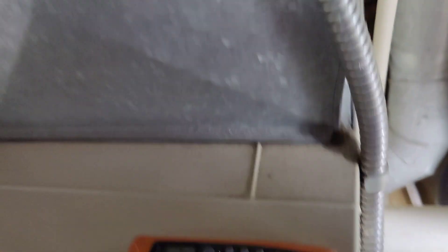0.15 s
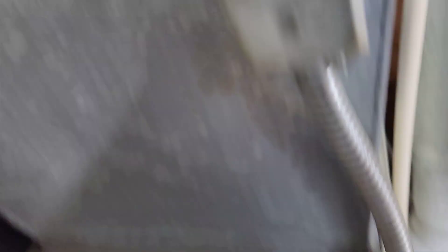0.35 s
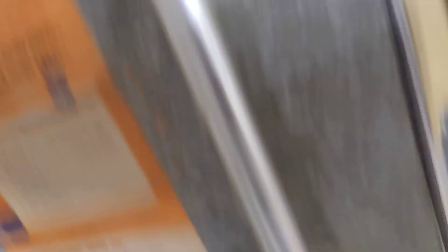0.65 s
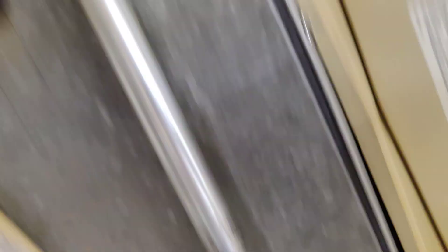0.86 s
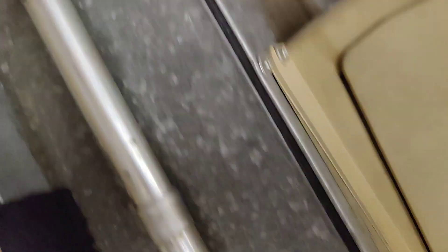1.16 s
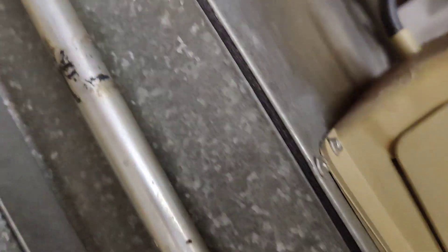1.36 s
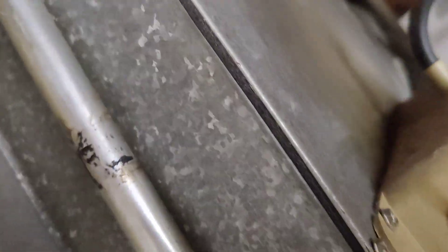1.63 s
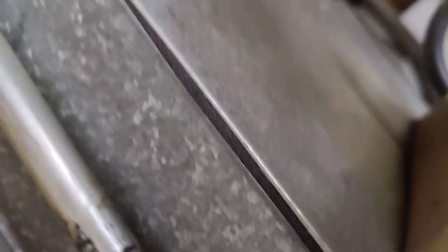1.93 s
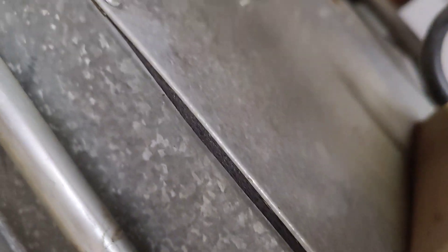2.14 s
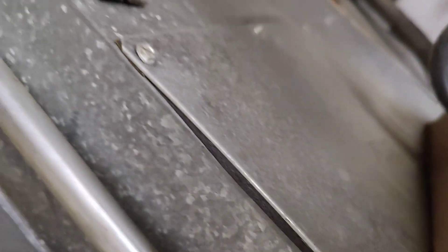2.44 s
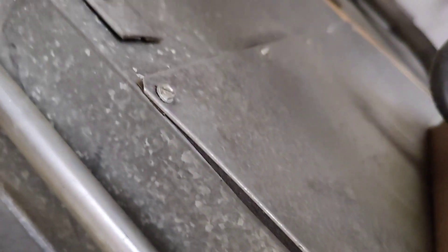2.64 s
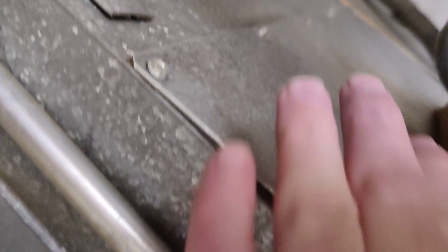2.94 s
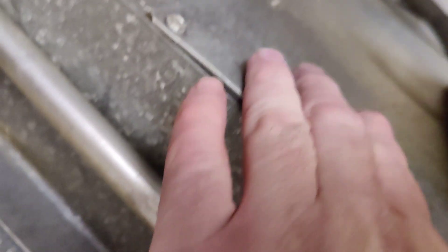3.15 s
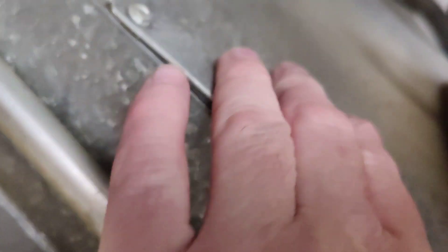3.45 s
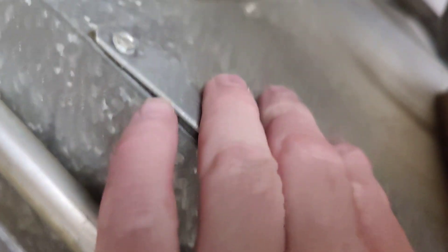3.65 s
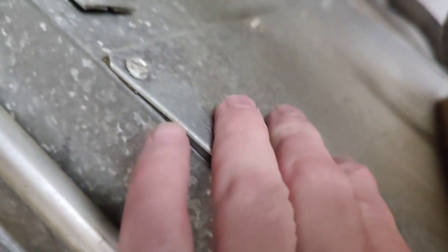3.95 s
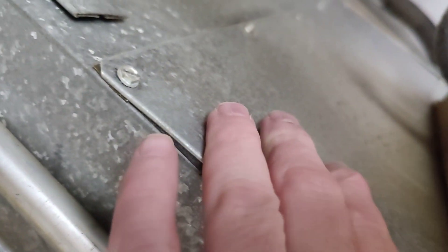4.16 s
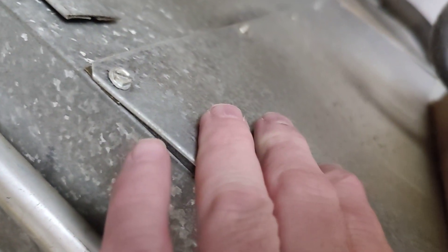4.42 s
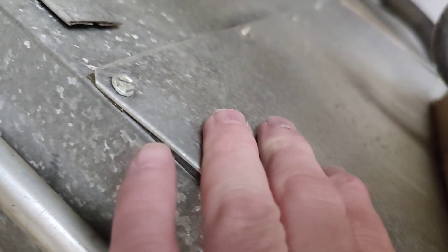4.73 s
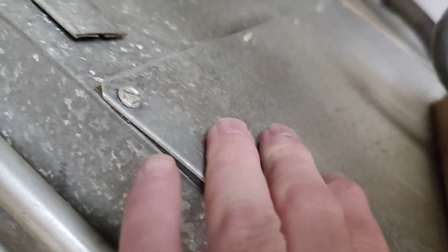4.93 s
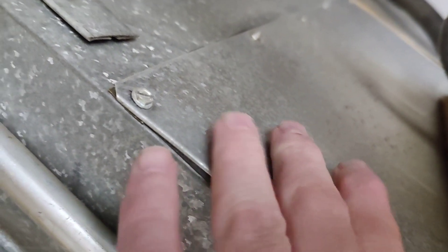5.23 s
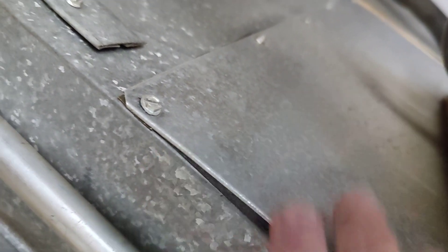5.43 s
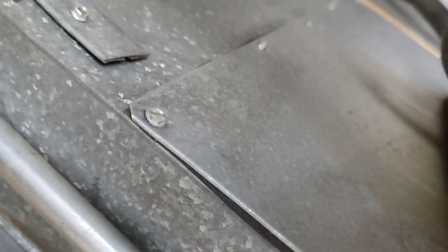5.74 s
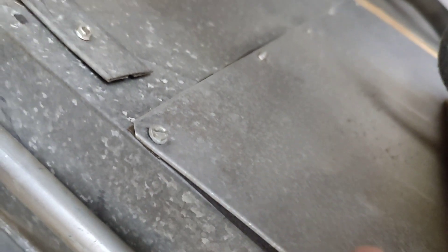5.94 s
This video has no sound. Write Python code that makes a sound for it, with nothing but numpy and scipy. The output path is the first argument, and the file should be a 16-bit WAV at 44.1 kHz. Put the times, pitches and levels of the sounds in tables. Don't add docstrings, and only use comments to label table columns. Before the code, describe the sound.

A furnace blower runs throughout: a constant deep electrical hum, fluctuating low duct rumble, a muffled roar of air and very faint hiss from the seams. A low soft knock on the microphone opens it, with two quick metallic slaps by 0.1 s, a clear tick near 0.3 s and another slap near 0.7 s. Rumble swells as the stereo microphone moves close, and a small tick comes about 1.15 s. From 1.5 to 3.1 s the loose panel slaps its seam in a fast, nearly regular rattle, about eight a second, weakening at the end. Faint skin rubs start around 2.4 s and the hand settles at 3.25 s. The rattle is silenced; only hum, booming air and small ticks near 3.5 and 4.5 s remain. At 5.4 s the hand shifts, a slap and low tick sound at 5.5 s, skin slides off around 5.7 s, and a light slap follows near 6 s.

```python
import sys
import numpy as np
from scipy import signal
from scipy.fft import rfft, irfft
from scipy.io import wavfile
from scipy.ndimage import uniform_filter1d

SR = 44100
rng = np.random.default_rng(int(sys.argv[2]) if len(sys.argv) > 2 else 0)


def digitize_waveform(pressure):
    field = np.atleast_2d(pressure).T
    bounded = np.clip(field, -1, 1)
    quanta = np.round(bounded * 32767).astype(np.int16)
    wavfile.write(sys.argv[1], SR, quanta)


def to_linear_factor(level_db):
    exponent = np.asarray(level_db, float) / 20
    return 10 ** exponent


N = 268348

# (time [s], nearness to the duct [0-1], aim as left minus right [dB])
CAMERA_PATH = [
    (0.0, 0.12, 0),
    (0.4, .2, 1.5),
    (0.9, 0.4, 1),
    (1.4, 0.7, -2),
    (1.9, 0.7, 4),
    (2.4, .95, -0.8),
    (3.0, 1, 1.3),
    (4.3, 1, -5),
    (6.08, 0.92, -5.5),
]
# (time [s], level [dB])
SURGES = [(0.0, -3), (0.39, 3.5), (0.6, -.7), (0.91, -4), (1.41, 2), (1.6, -2.5), (2.03, 4), (2.3, 0),
          (4.2, -1.4), (4.42, -3.5), (4.56, 1), (4.7, -2.2), (4.89, 1.5), (5.05, -3.5), (5.4, -0.8),
          (5.6, -3.5), (5.85, -3.5), (6.05, 2.5)]


def evened(x):
    return x / np.sqrt(np.mean(x ** 2) + 1e-20)


def read(points, hz):
    f, value = np.transpose(points)
    return np.interp(np.log(hz + 1), np.log(f + 1), value)


def closed(points, hz):
    inside = (hz >= points[0][0]) * (hz <= points[-1][0] + 300)
    return to_linear_factor(read(points, hz)) * inside


def curve(rows, column):
    rows = np.array(rows)
    return np.interp(np.arange(N) / SR, rows[:, 0], rows[:, column])


def coloured(x, gain):
    n = x.shape[-1]
    return irfft(rfft(x) * gain(np.fft.rfftfreq(n, 1 / SR)), n)


def add(mix, start_s, sound, pan_db):
    part = mix[:, round(start_s * SR):][:, :sound.shape[1]]
    sides = to_linear_factor(np.array([[pan_db], [-pan_db]]) / 2)
    part += (sound * sides)[:, :part.shape[1]]


def air(gain, patchy_db, flicker_db, size):
    # (frequency [Hz], left-right likeness [-1 to 1])
    likeness = [(60, 0.99), (150, 0.95), (250, 0.78), (400, 0.82), (630, 0.096), (1000, 0.011),
                (1600, 0.47), (2600, .01), (5500, 0.19), (8100, 0.33), (8400, .94), (12500, .93),
                (12900, .4)]
    # (frequency [Hz], left minus right [dB])
    side_lean = [(60, -0.6), (150, 0.9), (630, -0.2), (1600, 0.8), (4000, 0), (8200, -1), (15000, 2.5)]
    frames, hz = N * 4 // size + 5, np.fft.rfftfreq(size, 1 / SR)
    a, b, c, d, patches = rng.standard_normal((frames, len(hz), 5)).T
    patches = uniform_filter1d(patches, size=6, axis=0)
    patches = evened(uniform_filter1d(patches, size=10, axis=1))
    flicker = evened(uniform_filter1d(rng.standard_normal(frames), size=4))
    same = np.clip(read(likeness, hz), -1, 1)[:, None]
    left, other = a + 1j * b, c + 1j * d
    z = np.array([left, same * left + np.sqrt(1 - same ** 2) * other])
    z *= gain(hz)[:, None] * to_linear_factor(patchy_db * patches + flicker_db * flicker)
    z *= to_linear_factor(np.outer([.5, -.5], read(side_lean, hz)))[:, :, None]
    noise = signal.istft(z, nperseg=size, noverlap=size * 3 // 4)[1]
    return evened(noise[:, :N])


def thump():
    hz, t60_s = 70, .08
    t = np.arange(N) / SR
    return to_linear_factor(-19.5 - 60 * t / t60_s) * np.cos(2 * np.pi * hz * t)


def motor():
    hum_hz, drift_rad = 119.97, 0.27
    drift = uniform_filter1d(rng.standard_normal(N), size=9000)
    drift = evened(uniform_filter1d(drift, size=9000))
    phase = 2 * np.pi * hum_hz * np.arange(N) / SR + drift_rad * drift
    level_db = -28 + 1.05 * curve(CAMERA_PATH, column=1) + 0.057 * curve(SURGES, column=1)
    return to_linear_factor(level_db) * np.sqrt(2) * np.cos(phase)


def duct_rumble():
    # (frequency [Hz], density [dB per Hz])
    spectrum = [(20, -22.5), (32, -17), (52, -5.5), (68, 0.5), (78, -3.5), (97, -2), (105, -2.5),
                (111, -10.5), (130, -5), (155, -10), (172, -16.5), (200, -34)]
    rumble = air(lambda hz: closed(spectrum, hz), patchy_db=2.0, flicker_db=0.6, size=8192)
    level_db = -29.85 + 6 * curve(CAMERA_PATH, column=1) + curve(SURGES, column=1)
    return to_linear_factor(level_db) * rumble


def air_roar():
    # (frequency [Hz], density [dB per Hz])
    spectrum = [(150, -25), (185, 0), (225, -3.5), (250, -7), (310, -15), (420, -11.5), (540, -12.5),
                (660, -20.5), (830, -16), (1100, -24), (1800, -23.5), (2200, -26), (2800, -36.5),
                (3400, -53.5)]
    # (frequency [Hz], width [Hz], lift [dB])
    panels = [(214.5, 4.7, 5), (278, 31, 6.5), (365, 15, 4.5), (389.2, 25, 7), (464, 5, -1.5),
              (516, 6.7, -0.5), (540, 14, 2), (595.2, 18, 10), (677, 36, 2), (840, 36, 2), (970, 45, 1.5),
              (1127, 65, 5.5), (1385, 20, 2.5), (1850, 84, 1.5)]

    def gain(hz):
        lift_db = sum(db / (1 + (2 * (hz - f) / width) ** 2) for f, width, db in panels)
        return closed(spectrum, hz) * to_linear_factor(lift_db)

    near = curve(CAMERA_PATH, column=1)
    roar = air(gain, patchy_db=2.0, flicker_db=0.46, size=4096)
    boom = coloured(roar, lambda hz: 1 / (1 + (hz / 550) ** 4))
    roar = roar + (to_linear_factor(1.5 - 1.5 * near) - 1) * boom
    level_db = -37 - 2.5 * near + 0.1 * curve(SURGES, column=1)
    return to_linear_factor(level_db) * roar


def seam_leak():
    # (frequency [Hz], density [dB per Hz])
    hiss_spectrum = [(2300, -19), (3000, 0.5), (3800, -2.5), (4650, -2.5), (5050, -8.5), (6000, -10),
                     (6900, -10), (7500, -13.5), (8600, -23), (9800, -19), (11200, -22.5), (12400, -21),
                     (13900, -15.5), (15900, -18.5)]
    # (frequency [Hz], density [dB per Hz])
    sizzle_spectrum = [(5000, -28), (5700, -11), (6400, 2), (6900, 2.5), (7300, -10), (7800, -11),
                       (8400, -21.5)]
    # (time [s], level [dB])
    looseness = [(0.2, -72), (0.35, -63), (1.03, -69), (1.5, -71), (1.8, -67), (2.1, -63), (2.45, -76),
                 (3.23, -69), (3.74, -75.5), (5.27, -73.5), (5.62, -65.5), (6.08, -72)]
    hiss = air(lambda hz: closed(hiss_spectrum, hz), patchy_db=0.8, flicker_db=0.15, size=512)
    sizzle = air(lambda hz: closed(sizzle_spectrum, hz), patchy_db=0.0, flicker_db=1.9, size=256)
    hiss_db = -60.5 - 3 * curve(CAMERA_PATH, column=1)
    return to_linear_factor(hiss_db) * hiss + to_linear_factor(curve(looseness, column=1) - 4.5) * sizzle


def slap(db, bright_db, body_db, length_s):
    # (frequency [Hz], density [dB per Hz])
    crack_spectrum = [(800, -4.5), (1300, 2.5), (1900, -2.5), (2600, -12.5), (3600, -26), (4600, -18.5),
                      (5300, -17), (6800, -6.5), (7600, -14), (8700, -24), (10000, -18), (11700, -26),
                      (14000, -20), (15600, -28.5)]
    # (frequency [Hz], density [dB per Hz])
    ring_spectrum = [(800, -10.5), (2500, -15.5), (4600, -8.5), (5500, -9), (6400, -4.5), (6900, -6),
                     (7400, -8.5), (8700, -18), (11500, -21), (14000, -17), (15900, -21)]
    t = np.arange(round(.3 * SR)) / SR
    contacts = np.zeros(len(t))
    at, weakness = rng.random((2, 7))
    contacts[((.15 + at) * length_s * SR).astype(int)] = to_linear_factor(-8 - 5 * weakness - 8 * at)
    contacts[0] = 1
    chatter = np.convolve(contacts, to_linear_factor(-60 * t[:600] / .028))[:len(t)]
    tail = to_linear_factor(-12.5 - 60 * t / (11 * length_s)) + to_linear_factor(-25.0 - 60 * t / 0.92)
    shared, left, right = rng.standard_normal((3, len(t)))
    noise = np.array([left, right]) + 0.59 * shared

    def tilt(hz):
        return to_linear_factor(np.interp(hz, [2400, 3400, 8100, 8900], [body_db, 0, 0, bright_db]))

    crack = evened(coloured(noise, lambda hz: closed(crack_spectrum, hz) * tilt(hz)))
    ring = evened(coloured(noise[:, ::-1], lambda hz: closed(ring_spectrum, hz) * tilt(hz)))
    body = coloured(crack, lambda hz: hz < 2800)
    swell = 0.88 * (1 - np.exp(-t / 0.003)) * to_linear_factor(-60 * t / 0.15)
    blow = (crack - body) * chatter + body * swell + ring * tail
    return to_linear_factor(db + 4.5) * blow * np.minimum(t * 1800, 1)


def tick(db, pitch_hz, over_db):
    # (multiple of the pitch [ratio], level [dB])
    overtones = [(.5, 6.5), (1.499, 0.5), (2.1, -14.5)]
    t60_s = 66 / pitch_hz
    t = np.arange(round(.04 * SR)) / SR
    modes = np.sin(2 * np.pi * pitch_hz * t)
    for multiple, mode_db in overtones:
        modes = modes + to_linear_factor(over_db + mode_db) * np.sin(2 * np.pi * pitch_hz * multiple * t)

    def near_pitch(hz):
        return np.exp(-(np.log((hz + 1) / (1.08 * pitch_hz)) / .16) ** 2)

    snap = evened(coloured(rng.standard_normal(len(t)), near_pitch))
    ring = modes * to_linear_factor(-60 * t / t60_s) * (1 - np.exp(-t / 0.0003))
    ring = ring + to_linear_factor(-2.0 - 60 * t / 0.006) * snap
    lags = (rng.uniform(0.0067, .0085, (2, 2)) * SR).astype(int)
    heard = [ring + sum(.22 * np.roll(ring, lag) for lag in pair) for pair in lags]
    return to_linear_factor(db + 4) * np.array(heard)


def rub(length_s, db, fade_db):
    # (frequency [Hz], density [dB per Hz])
    spectrum = [(2600, -26), (3600, -6.5), (4600, -4.5), (5300, -8), (6900, -2), (8600, -14.5),
                (10000, -9.5), (11500, -13.5), (13800, -6), (15700, -6.5)]
    rise, release = .12, 0.32
    u = np.arange(0, length_s, 1 / SR) / length_s
    grit = rng.standard_normal((3, len(u))) * to_linear_factor(1.7 * rng.exponential(1, len(u)))
    hiss = evened(coloured(grit[:2] + 0.57 * grit[2], lambda hz: closed(spectrum, hz)))
    dull = coloured(hiss, lambda hz: hz < 8300)
    hiss = hiss + (to_linear_factor(2.5 * u) - 1) * dull
    stroke = np.minimum(np.minimum(u / rise, (1 - u) / release), 1)
    return stroke * to_linear_factor(db + fade_db * u + 6.5) * hiss


def scene():
    # (time [s], level [dB], brightness [dB], chatter length [s])
    slaps = [(0.017, -57.5, 0.5, 0.0045), (0.073, -48.5, 1, 0.02), (0.674, -48.5, 0, 0.015),
             (1.5174, -51.5, -2.5, 0.014), (1.6344, -44.5, -4.5, 0.013), (1.756, -45, -4, 0.012),
             (1.8764, -42, -1.5, 0.012), (1.996, -46, -8, .01), (2.118, -48.5, -6, 0.0091),
             (2.2363, -43, -2.5, 0.01), (2.356, -43.5, 4, .012), (2.478, -45.5, 2, 0.013),
             (2.721, -44.5, 2, 0.011), (2.84, -47, 2.5, 0.013), (2.968, -57, -1.5, .008),
             (3.087, -60.5, -2.5, 0.0076), (5.498, -48, 4, 0.004), (5.98, -51.5, -2.5, 0.006)]
    # (time [s], level [dB], pitch [Hz], overtones [dB])
    ticks = [
        (.1125, -58, 4300, -14),
        (0.2865, -44.5, 4160, -17),
        (1.0893, -65, 8260, -16),
        (1.1485, -50, 4550, 3.5),
        (3.496, -57.5, 4300, -19),
        (4.463, -54, 4310, -8),
        (5.499, -50, 1990, -11),
        (6.0555, -62.5, 6500, -18),
    ]
    # (start [s], length [s], level [dB], fade over the stroke [dB])
    rubs = [
        (0.313, .045, -69, -3),
        (2.378, .095, -68, -2.5),
        (2.6, .11, -74, -4.5),
        (2.734, .08, -66.5, -8.5),
        (3.198, .05, -73.5, -2),
        (3.242, .17, -64.5, -8.5),
        (5.403, .055, -67.5, -7.5),
        (5.664, 0.13, -63.5, -6.5),
    ]
    mix = thump() + motor() + duct_rumble() + air_roar() + seam_leak()
    aim_db = curve(CAMERA_PATH, column=2)
    for s, db, bright_db, length_s in slaps:
        pan_db = aim_db[round(s * SR)]
        body_db = 4 + .35 * bright_db - 1.2 * pan_db
        add(mix, s, slap(db, bright_db, body_db, length_s), pan_db)
    for s, db, pitch_hz, over_db in ticks:
        add(mix, s, tick(db, pitch_hz, over_db), aim_db[round(s * SR)])
    for s, length_s, db, fade_db in rubs:
        add(mix, s, rub(length_s, db, fade_db), pan_db=0.5)
    return mix


def band_limit(x):
    return signal.sosfilt(signal.butter(12, 15830, fs=SR, output="sos"), x)


def record(dry):
    left_s = np.arange(N)[::-1] / SR
    fade = np.minimum(.35 + left_s / .004, 1)
    return band_limit(dry * fade)


dry = scene()
out = record(dry)
digitize_waveform(out)
```